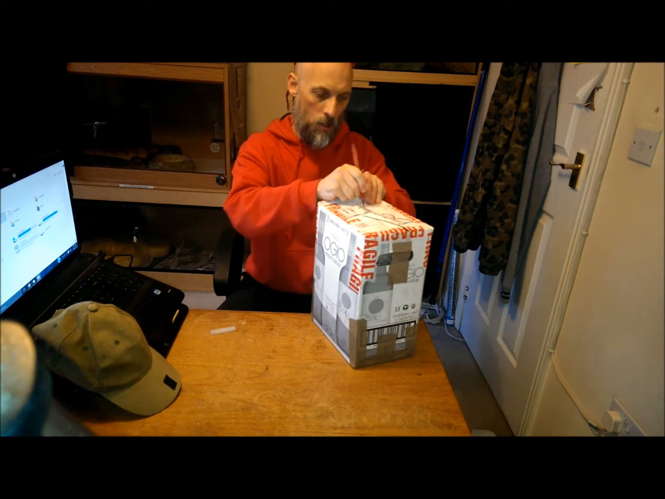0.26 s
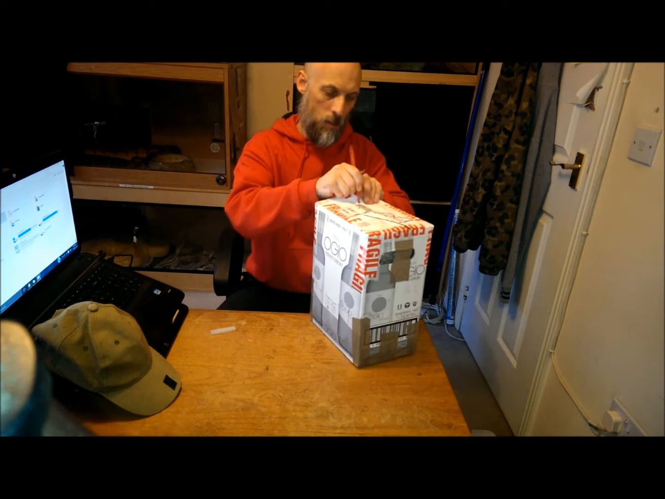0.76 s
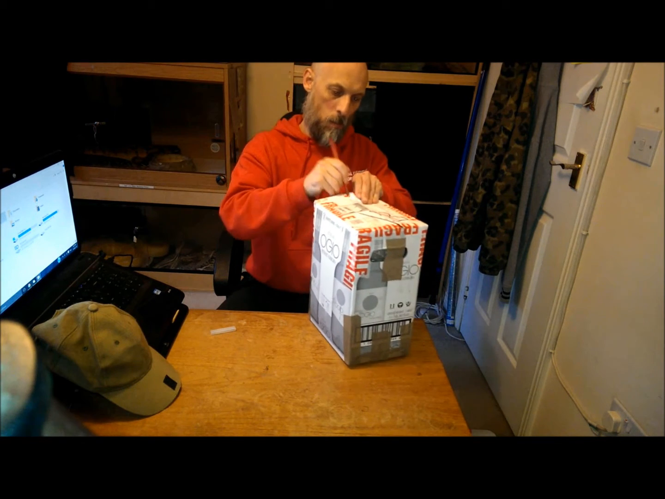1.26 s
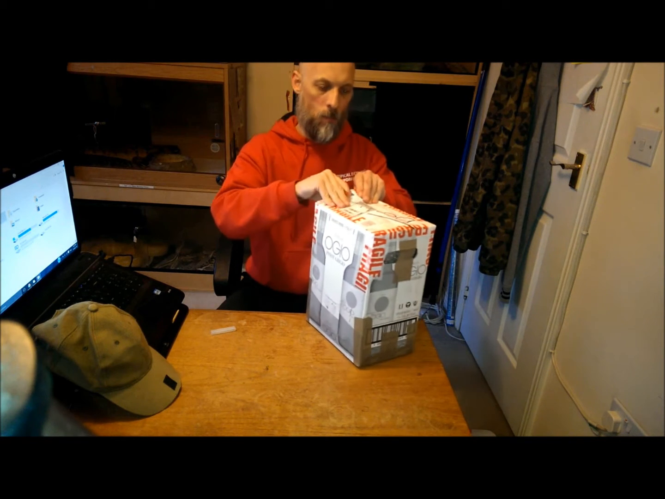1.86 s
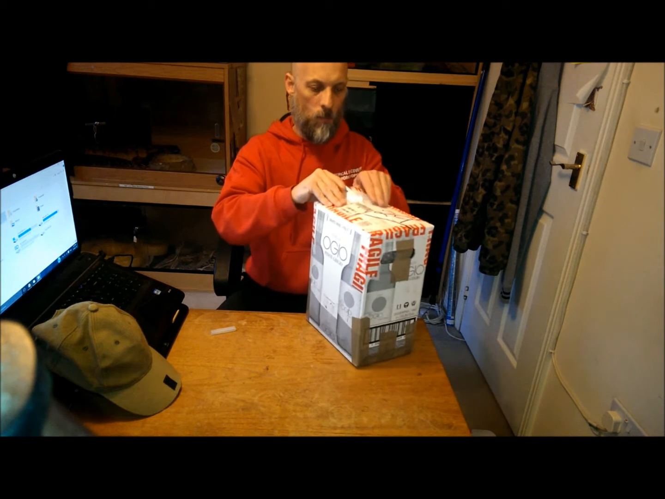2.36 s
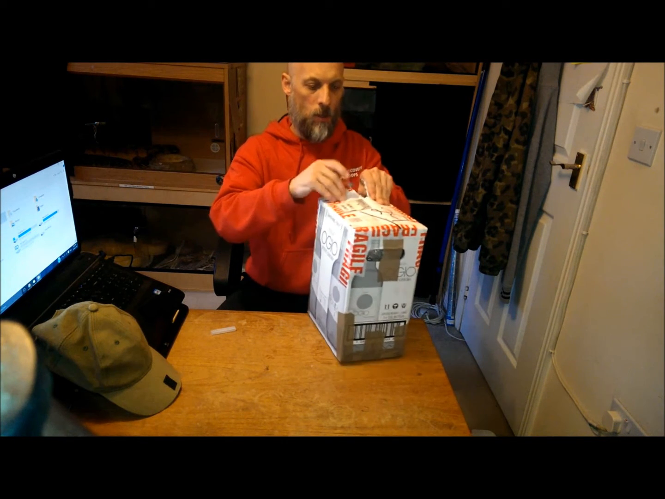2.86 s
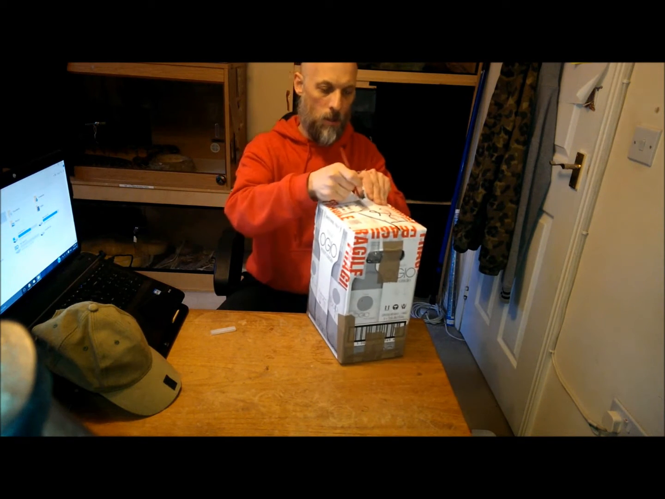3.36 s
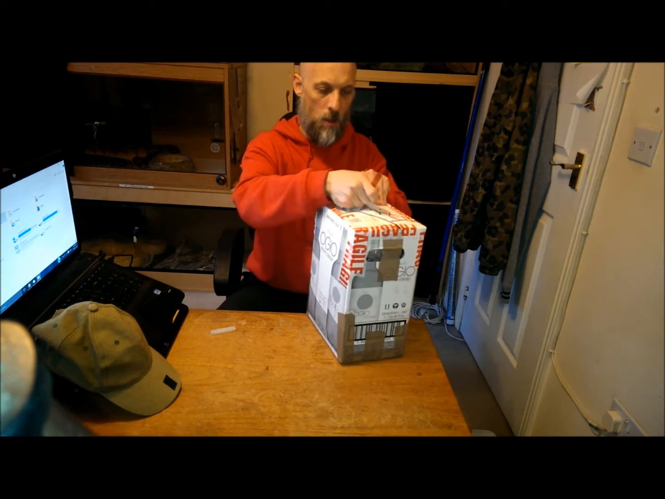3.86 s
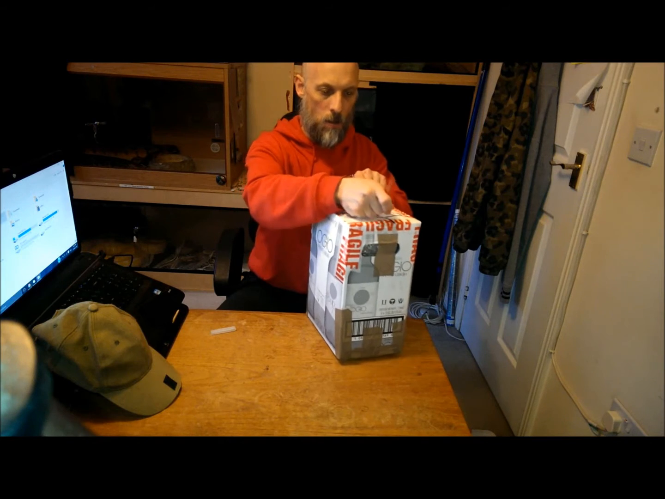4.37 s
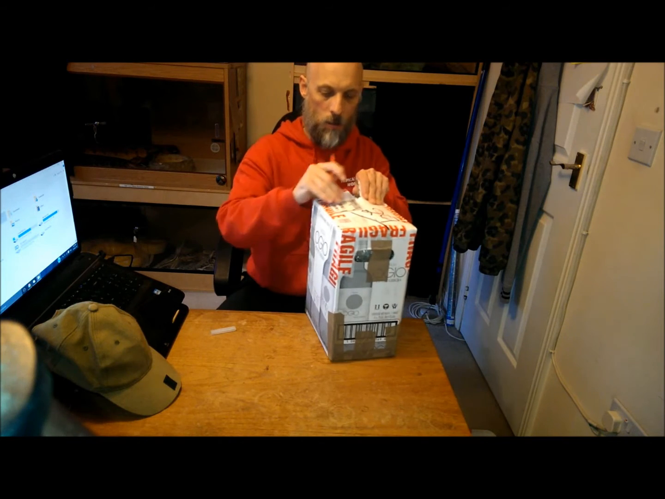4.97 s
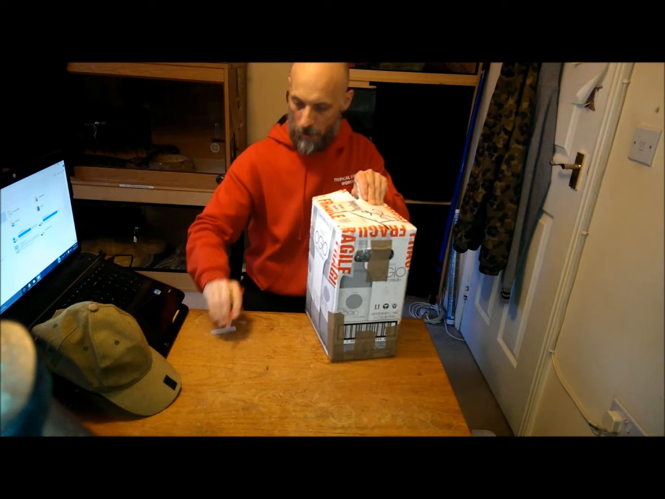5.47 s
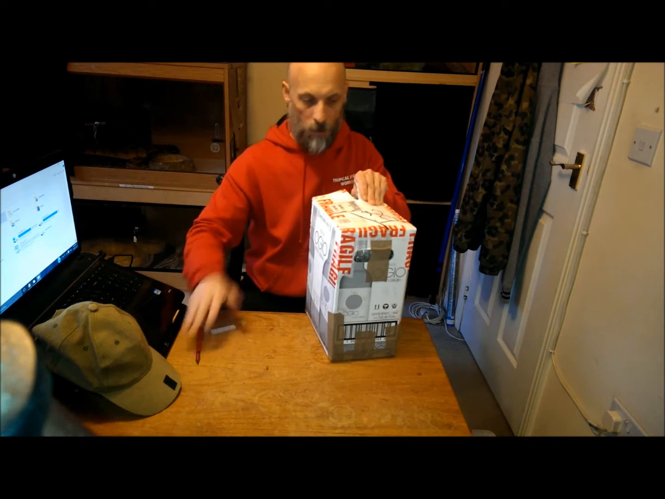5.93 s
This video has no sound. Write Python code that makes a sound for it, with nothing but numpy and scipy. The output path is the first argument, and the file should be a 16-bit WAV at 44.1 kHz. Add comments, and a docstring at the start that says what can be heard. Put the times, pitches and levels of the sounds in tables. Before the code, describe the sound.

Close by in a small hard room, fingers rustle on a hollow cardboard box and pick at packing tape: sharp isolated snaps, clustered crackles and tiny rips. After a sparser moment comes a rasping peel of about half a second, then a few clicks, and at the end a plastic pen rattles onto a wooden desk. Stereo microphones with faint hiss and low rumble.

```python
"""Packing tape is picked at and torn off a hollow cardboard box in a small hard room, in stick-slip motion:
the glue lets go in single snaps and in rasping runs of tiny slips, both ringing through tape, glue, film and box.
At the end a plastic pen drops onto the wooden desk and clatters, as kicks to the damped modes of barrel and desk.
Near surfaces reflect, the walls answer diffusely, and a microphone pair hisses faintly over a low rumble."""
import sys
import numpy as np
from scipy import signal
from scipy.fft import rfft, irfft, next_fast_len
from scipy.io import wavfile
from scipy.ndimage import map_coordinates

SR = 44100
rng = np.random.default_rng(int(sys.argv[2]) if len(sys.argv) > 2 else 0)


def put_to_file(sound):
    """Save the sound as 16-bit audio at rate SR, in the file named by the first command-line argument."""
    columns = np.atleast_2d(sound).T  # one column per channel
    safe = np.clip(columns, -1, 1)
    whole_steps = np.round(safe * 32767)
    wavfile.write(sys.argv[1], SR, whole_steps.astype(np.int16))


N = 273420  # length in samples


def amp(db):
    """Decibel law: level to amplitude ratio."""
    return 10 ** (np.asarray(db) / 20)


def unit(x):
    """Normalisation to an rms of 1."""
    return x / np.sqrt(np.mean(x ** 2) + 1e-20)


def along(points, hz):
    """Linear interpolation of (f/Hz, value) points on a logarithmic frequency axis."""
    f, value = np.transpose(points)
    return np.interp(np.log(hz + 1), np.log(f + 1), value)


def filtered(x, response):
    """Linear filtering: the spectrum of x times a complex response of frequency."""
    m = next_fast_len(x.shape[-1] + SR // 2)
    spectrum = rfft(x, m) * response(np.fft.rfftfreq(m, 1 / SR))
    return irfft(spectrum, m)[..., :x.shape[-1]]


def modes(table):
    """Modal superposition: impulse response, of energy 1, of damped resonances in alternating sign."""
    def ring(f):
        total = 0
        for k, (centre, width, db) in enumerate(table):
            damping = 1j * f * width
            total = total + (-1) ** k * amp(db) * damping / (centre ** 2 - f ** 2 + damping)
        return total

    h = filtered(signal.unit_impulse(4096), ring)
    return h / np.linalg.norm(h)


def pulse(spectrum):
    """Minimum phase: the causal pulse of energy 1 with this spectrum, by folding its cepstrum."""
    magnitude = amp(along(spectrum, np.fft.rfftfreq(2048, 1 / SR)))
    cepstrum = irfft(np.log(np.maximum(magnitude, 1e-3)))
    cepstrum[1:1024] *= 2
    cepstrum[1025:] = 0
    h = irfft(np.exp(rfft(cepstrum)))[:1024]
    return h / np.linalg.norm(h)


def blows(s, db):
    """Impulsive excitation: one clean kick at each time."""
    return np.bincount(np.round(s * SR).astype(int), amp(db), N)


# self-noise spectrum: f/Hz, spectral level/dB per Hz
HISS_SPECTRUM = [(120, -45), (200, -4), (689, -7.5), (1310, -9), (1870, -10), (9480, -15), (11200, -15.5),
                 (13700, -15.5), (16500, -19.5)]
# house rumble spectrum: f/Hz, spectral level/dB per Hz
RUMBLE_SPECTRUM = [(15, -18), (40, 4.5), (70, -1.5), (120, 1.5), (200, -6), (300, -14.5), (600, -57)]
HISS_DB, RUMBLE_DB = -70.5, -74.5  # before the ports' imbalance and the recorder's filter


def hiss():
    """Incoherent noise: unrelated self-noise of the two ports over a faint, unsteady house rumble."""
    def noise(spectrum):
        white = rng.standard_normal((2, N))
        return unit(filtered(white, lambda hz: amp(along(spectrum, hz))))

    drift = map_coordinates(rng.standard_normal(40), [np.arange(N) * 5 / SR])  # 5 random points a second
    both = amp(HISS_DB) * noise(HISS_SPECTRUM) + amp(RUMBLE_DB + 3.5 * drift) * noise(RUMBLE_SPECTRUM)
    return both * amp([[1.7], [-1.7]])  # the left port is the noisier


# coherence of the room answer: f/Hz, left-right likeness
LIKENESS = [(60, 0.89), (300, 0.71), (700, 0.27), (1500, 0.029), (15000, 0.059)]
# decay time of the room: f/Hz, t60/s
WALL_DECAY = [(100, 0.23), (400, 0.23), (2500, 0.22), (8000, .2), (15000, 0.18)]


def room(x):
    """Diffuse-field reverberation, with a new random tail for every fifth of a second."""
    out, hop = np.zeros((2, N + 2 * SR)), SR // 5
    for at in range(0, N, hop):
        hz, t, z = signal.stft(rng.standard_normal((2, SR // 3)), SR, nperseg=256)
        decay = amp(-60 * t / along(WALL_DECAY, hz)[:, None])
        # weights of sum and difference that give the two sides their likeness
        angle = np.arccos(np.clip(along(LIKENESS, hz), -1, 1)) / 2
        z = z * decay * np.array([np.cos(angle), np.sin(angle)])[..., None]
        mid, side = signal.istft(z, SR, nperseg=256)[1]
        build_up = 1 - np.exp(-np.arange(len(mid)) / (.009 * SR))
        tail = np.array([mid + side, mid - side]) * build_up
        wet = signal.fftconvolve(x[None, at:at + hop], tail / np.linalg.norm(tail[0]), axes=1)
        out[:, at:at + wet.shape[1]] += wet
    return out[:, :N]


# echoes from desk, wall and door: delay t/s, level/dB
REFLECTIONS = [(.0022, -4), (.0045, -5), (.0056, -5), (.0075, -10), (.0112, -11), (.0158, -10)]


def early(x):
    """Specular reflection: delayed copies from near surfaces, duller than the direct sound."""
    def copies(hz):
        total = sum(amp(db) * np.exp(-2j * np.pi * hz * s) for s, db in REFLECTIONS)
        return total / (1 + 1j * hz / 9000)

    return filtered(x, copies)


# colour of the left port over the right: f/Hz, level/dB
PORT_COLOUR = [(60, 13.5), (130, 11), (290, 7), (640, 9), (1410, 3), (3100, 8), (6820, 0), (15000, -9.5)]


def ports(x, lag_s):
    """Level and time difference of a pair: each port has its colour, the left hears lag_s later."""
    side = np.array([[1], [-1]]) / 2

    def response(hz):
        delay = np.exp(-2j * np.pi * hz * lag_s * (side + .5))
        return amp(side * along(PORT_COLOUR, hz)) * delay

    return filtered(x, response)


# treble spectrum of crinkling film: f/Hz, spectral level/dB per Hz
CRINKLE = [(4000, -37.5), (6800, 1), (8300, 2), (10300, 0), (12300, 3), (15100, -3.5), (16500, -17)]


def treble_tick():
    """Broadband transient: the crinkle of the film, which also serves as the tick of the pen."""
    return pulse(CRINKLE)


# contacts of pen and desk: t/s, level/dB, desk knock level/dB (relative)
PEN_CONTACTS = [(5.822, -45.5, 2.5), (5.8869, -20.5, 0.5), (5.9734, -34.5, -14), (5.986, -10, -11),
                (5.9886, -18.5, -8.5)]
# modes of the pen barrel: f/Hz, width/Hz, level/dB
BARREL_MODES = [(1240, 380, -3.5), (1970, 660, 2), (2360, 170, 7), (2800, 350, 2), (4200, 830, 0),
                (5570, 2400, -11.5)]
# modes of the desk top: f/Hz, width/Hz, level/dB
DESK_MODES = [(248, 180, -6.5), (475, 69, 2), (900, 180, 3)]
PEN_TICK_DB = -13.5  # relative to the barrel


def pen():
    """Modal excitation by impact: the light barrel clacks and knocks the desk."""
    s, db, knock_db = np.transpose(PEN_CONTACTS)
    clack = signal.fftconvolve(blows(s, db), modes(BARREL_MODES))[:N]
    knock = signal.fftconvolve(blows(s, db + knock_db), modes(DESK_MODES))[:N]
    tick = signal.fftconvolve(blows(s, db + PEN_TICK_DB), treble_tick())[:N]
    return clack + knock + tick


def slips(per_s, spread_db):
    """Stick-slip as shot noise: random releases of unequal size that come in clumps, rms 1."""
    size = amp(spread_db * rng.standard_normal(N)) * rng.choice([-1, 1], N)
    clumps = map_coordinates(rng.standard_normal(N // 350 + 4), [np.arange(N) / 350])
    return unit(size * amp(3 * clumps) * (rng.random(N) < per_s / SR))


# glue line over the tape, at brightness 0: in snaps and short rips, and in sustained runs
SHORT_RASP_DB, RUN_RASP_DB = 3, 4
RASP_FOLLOWS = .6  # share of the brightness that the glue line follows


def shares(db, bright, box, rasp_db):
    """Division of the excitation: levels that drive tape, glue line, box and film."""
    return np.array([db, db + rasp_db + RASP_FOLLOWS * bright, db + box, db + bright])


def over_time(rows):
    """Piecewise linear contours of the columns, at -140 dB outside their times."""
    s, *columns = np.transpose(rows)
    return [np.interp(np.arange(N) / SR, s, c, -140, -140) for c in columns]


# fingers rustling on tape and box: t/s, level/dB
RUSTLE_LEVEL = [(0, -91.5), (.26, -78.5), (.61, -77), (.89, -75.5), (1.2, -74.5), (1.45, -83.5), (1.7, -76),
                (1.87, -83), (2.05, -70.5), (2.3, -75), (2.64, -72.5), (2.79, -69), (2.97, -90.5),
                (3.55, -112), (3.8, -79.5), (4.04, -81.5), (4.77, -84), (4.95, -95.5), (5.75, -98)]
RUSTLE_BRIGHT_DB, RUSTLE_BOX_DB = -5.5, -4


def rustle(grain):
    """Sliding friction: fingers rub tape and box, as slips under a slow level contour."""
    return grain * amp(shares(*over_time(RUSTLE_LEVEL), RUSTLE_BRIGHT_DB, RUSTLE_BOX_DB, RUN_RASP_DB))


# a few millimetres of glue at once: t/s, level/dB, brightness/dB, box knock/dB (both relative), length/ms
SHORT_RIPS = [(0.204, -62, -9, -2.5, 9), (0.3521, -53.5, -6, 1.5, 9.7), (0.7834, -52, -3, -11, 10.8),
              (0.954, -46.5, 1, -10, 10), (0.964, -40, 6.5, -16, 9), (1.164, -58.5, -22, 2.5, 6.1),
              (1.277, -45.5, -7.5, -7, 14), (1.3865, -71, -27, 9, 8.6), (1.7592, -51.5, -11, -4, 7.1),
              (1.9825, -53, -16, 2.5, 8.2), (1.9934, -48, -15, -12, 6.4), (2.337, -68, 4, 2.5, 12),
              (3.653, -57, -8.5, -3.5, 12.3), (3.946, -60, -11, 1.5, 6.6), (4.0843, -42.5, -0.5, -7.5, 9.5)]


def rips(grain):
    """Transient stick-slip: bursts of slips that rise at once and die within hundredths of a second."""
    s, *levels, length_ms = np.transpose(SHORT_RIPS)
    ms, swell = np.arange(SR // 5) * 1000 / SR, np.zeros((4, N + SR))
    for at, level, length in zip(s, shares(*levels, SHORT_RASP_DB).T, length_ms):
        envelope = (1 - np.exp(-ms / 1.5)) * np.exp(-(ms / length) ** 2)
        swell[:, round(at * SR):][:, :len(ms)] += amp(level)[:, None] * envelope
    return grain * swell[:, :N]


# short pulls on the tape: start t/s, length/s, level/dB, brightness/dB (relative)
SHORT_PULLS = [(0.674, 0.16, -76, 7), (0.946, 0.094, -59, -4.5), (1.275, 0.094, -63, -7),
               (4.093, 0.055, -57.5, -2)]
PULL_ATTACK_S, PULL_RELEASE_S, PULL_BOX_DB = 0.024, 0.041, -7.5  # the level moves 20 dB in each time


def pulls(grain):
    """Sustained stick-slip: runs of slips with exponential attack, hold and release."""
    t, gain = np.arange(N) / SR, 0
    for start, length, db, bright in SHORT_PULLS:
        attack = np.clip((start - t) / PULL_ATTACK_S, 0, 9)
        release = np.clip((t - start - length) / PULL_RELEASE_S, 0, 9)
        gain = gain + amp(shares(db - 20 * (attack + release), bright, PULL_BOX_DB, RUN_RASP_DB))
    return grain * gain


# the long peel: t/s, level/dB, brightness/dB (relative)
LONG_PEEL = [(4.225, -77, -4), (4.26, -60.5, -3.5), (4.33, -54.5, -3.5), (4.4, -57.5, -7.5),
             (4.475, -56, -7.5), (4.529, -57, -10.5), (4.567, -62, -5.5), (4.655, -58, -8), (4.7, -101, -4)]
PEEL_BOX_DB = -6.5


def peel(grain):
    """Continuous stick-slip: one long run of slips whose level and brightness wander."""
    return grain * amp(shares(*over_time(LONG_PEEL), PEEL_BOX_DB, RUN_RASP_DB))


# glue releases and fingernail picks: t/s, level/dB, brightness/dB, box knock/dB (last two relative)
SINGLE_SNAPS = [(0.4544, -17.5, -1.5, -4.5), (0.7187, -32, -11, -8), (0.968, -33, 4, 0),
                (0.9827, -25, 3, 2), (1.0084, -20.5, -1, -23), (1.0205, -43, -15, -18),
                (1.215, -49, 10.5, -15), (1.856, -37.5, -27, -11), (1.875, -34.5, 0, -14),
                (1.9427, -35, -6.5, -19), (2.0435, -37, -11, -23), (2.0942, -9, -0.5, -1.5),
                (2.3197, -35, -4, 0), (2.5318, -40, -17, -2.5), (2.618, -39.5, 1, -11),
                (2.6735, -15, -9.5, -11), (2.69, -23, 0.5, -13), (2.9027, -34.5, -10.5, -12),
                (3.665, -38, -7, -8), (3.7275, -45.5, 1, -1), (3.799, -56, 7, -8), (3.927, -45, -1, -4),
                (3.943, -35, -6, -4), (4.025, -51.5, 10.5, -10), (4.629, -22.5, -21, -1.5),
                (4.9604, -24, -9.5, -8), (5.1192, -39, -9, -9), (5.3795, -40.5, -5.5, -3.5),
                (5.6607, -47, -2.5, -20)]


def snaps():
    """Impulsive release: each snap of the glue or pick of a fingernail is one kick."""
    s, *levels = np.transpose(SINGLE_SNAPS)
    return np.array([blows(s, db) for db in shares(*levels, SHORT_RASP_DB)])


# tape under tension: f/Hz, spectral level/dB per Hz
TAPE_TWANG = [(500, -24), (1000, -2), (1600, 1), (2100, 1.5), (2600, 0.5), (3100, -6.5), (4200, -32),
              (7000, -63.5)]
# glue line: f/Hz, spectral level/dB per Hz
GLUE_RASP = [(1900, -37), (3000, -5.5), (3700, -1.5), (5200, -4), (6300, -10.5), (8500, -32.5),
             (15000, -76)]
# modes of the hollow box: f/Hz, width/Hz, level/dB
BOX_MODES = [(69.4, 26.3, -7), (110, 40, -7), (231, 48, 2), (324, 120, -0.5), (409, 98, 1), (564, 205, -4),
             (828, 184, -6.5)]


def tape():
    """Source-filter principle: snaps and slips heard through the tape, its glue line, the box and the film."""
    grain = slips(per_s=2200, spread_db=5)
    drives = rustle(grain) + rips(grain) + pulls(grain) + peel(grain) - snaps()  # snaps kick downward
    bodies = [pulse(TAPE_TWANG), pulse(GLUE_RASP), modes(BOX_MODES), treble_tick()]
    return sum(signal.oaconvolve(drive, body)[:N] for drive, body in zip(drives, bodies))


def scene():
    """Superposition of direct sound, early reflections, diffuse room and noise."""
    box, drop = tape(), pen()
    facing = amp([[0], [5.5]])  # the right port looks at the box
    direct_box = ports(box, lag_s=.00015) * facing  # the box is nearer to the right port
    box_echoes = ports(early(box), lag_s=.0001)
    pen_near = ports(amp(3.5) * drop + early(drop), lag_s=.00034)
    diffuse = amp(5) * ports(room(box + drop), lag_s=0)
    return direct_box + box_echoes + pen_near + diffuse + hiss()


TOP_HZ = 15750  # band limit
OFFSET = .00033  # standing offset of the converter, full scale 1


def record(dry):
    """Band limitation: the deepest bass is thinned, all above the limit removed, a small offset added."""
    def band(hz):
        return (hz < TOP_HZ) * (1j * hz / (45 + 1j * hz)) ** 2

    return filtered(dry, band) + OFFSET


dry = scene()
out = record(dry)
put_to_file(out)
```